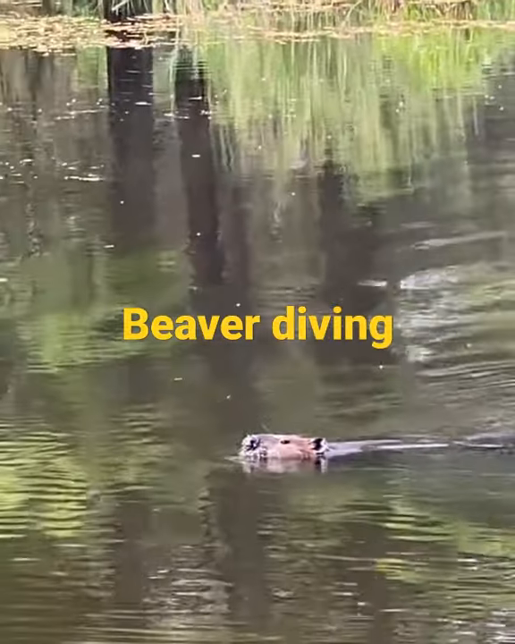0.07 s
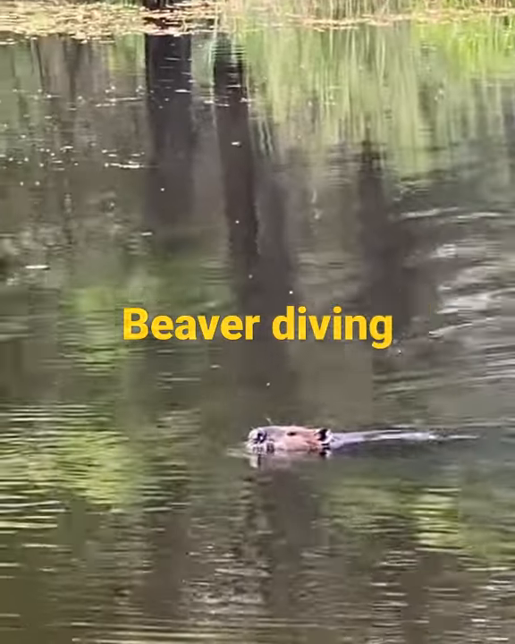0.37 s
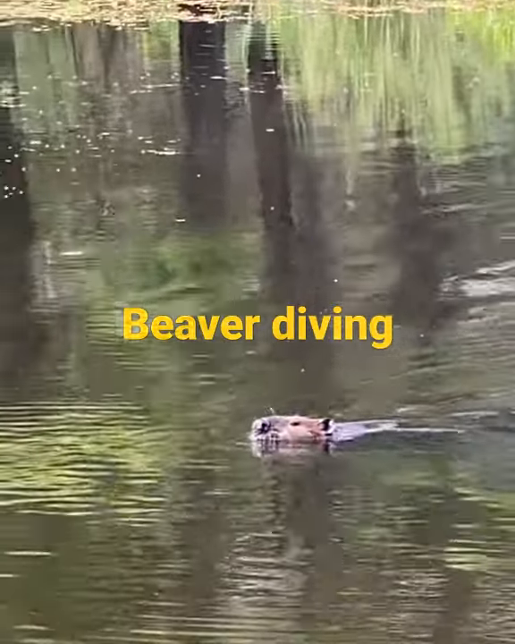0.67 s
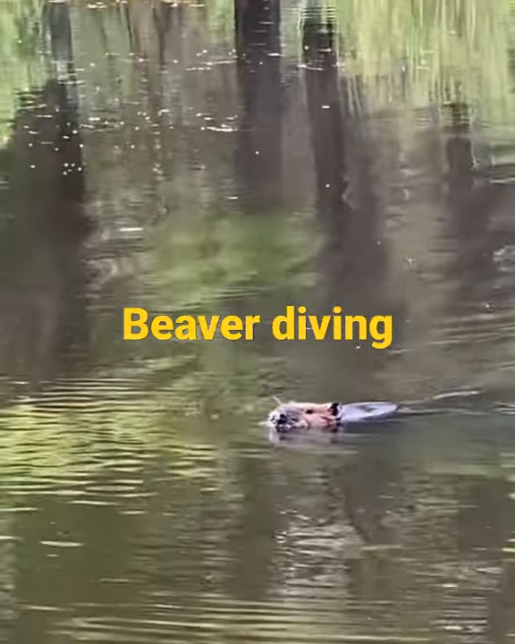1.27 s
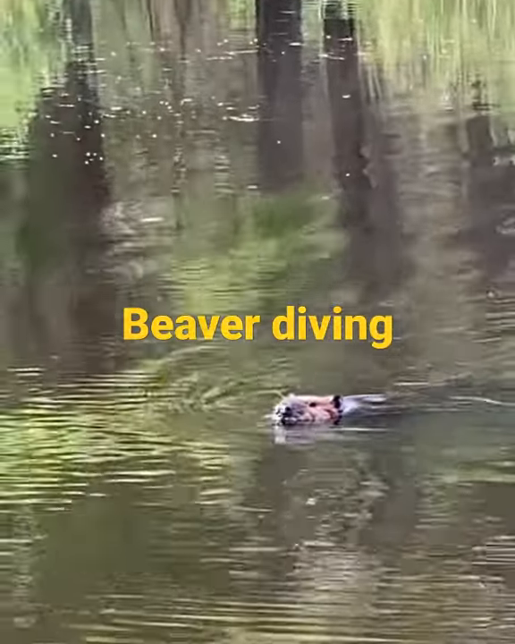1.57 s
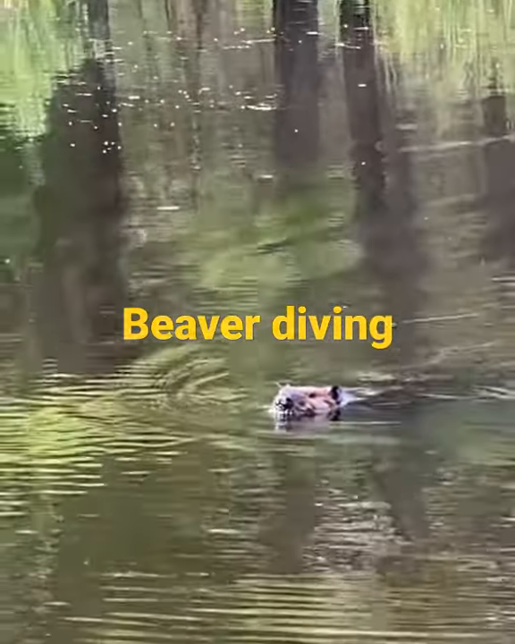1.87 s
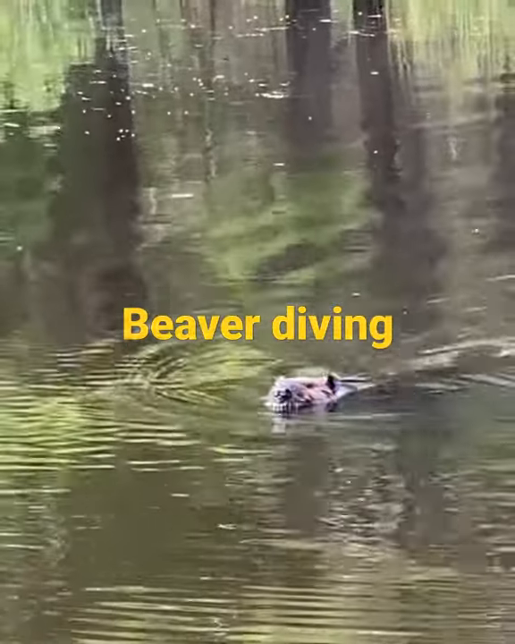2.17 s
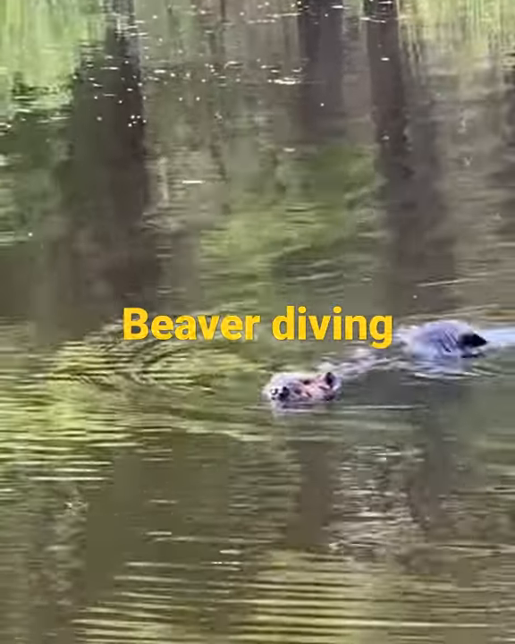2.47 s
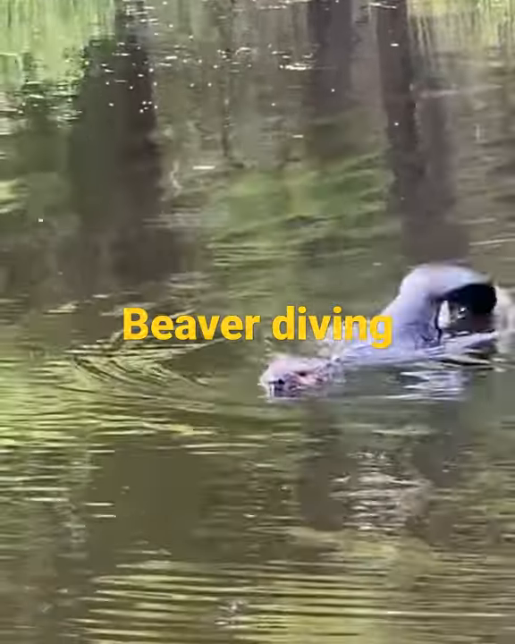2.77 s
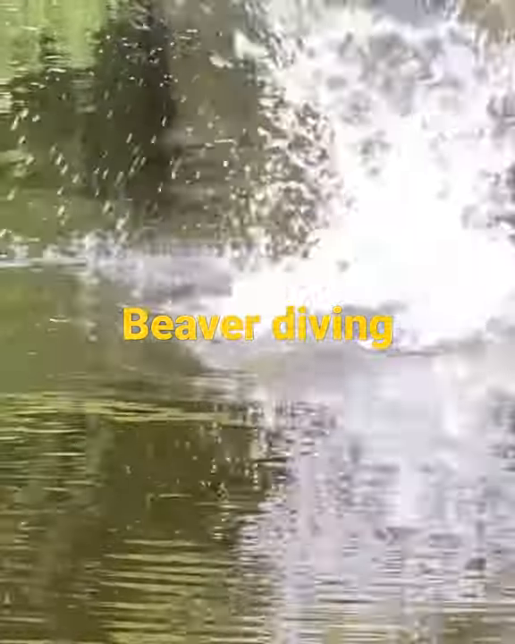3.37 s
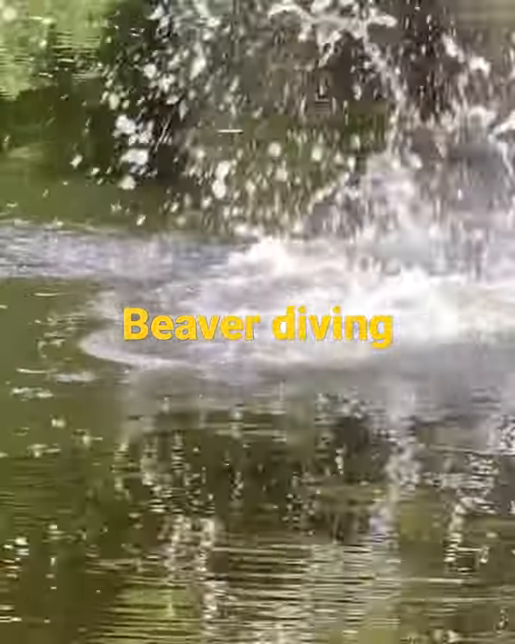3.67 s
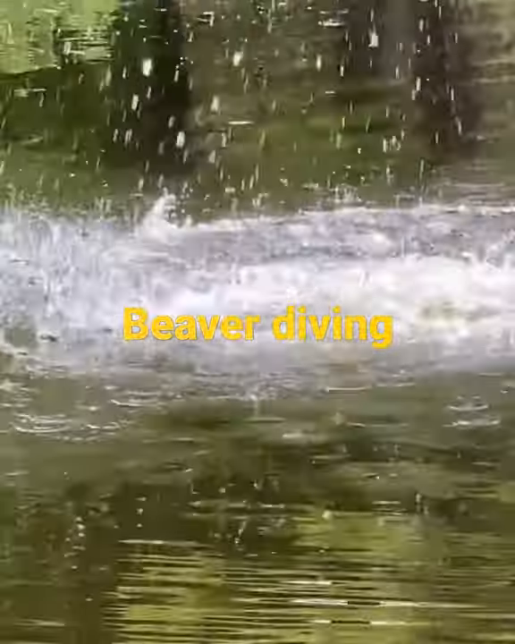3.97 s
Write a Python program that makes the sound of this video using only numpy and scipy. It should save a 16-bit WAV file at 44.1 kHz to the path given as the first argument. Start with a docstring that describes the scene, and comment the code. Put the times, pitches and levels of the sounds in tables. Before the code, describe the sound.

A sharp beaver tail slap on a quiet pond, followed by a booming, splashing dive.

```python
"""Beaver tail slap on a pond

A swimming beaver slaps its tail on the water, kicks and dives. Each impact cracks on the surface and
opens an air cavity whose resonance falls as it grows; the dive's cavity booms, then rises as it closes.
Thrown water rains back as spray, drops and ringing bubbles. The wooded bank reverberates faintly,
over a distant hush and a low rumble."""
import sys
import numpy as np
from scipy import signal
from scipy.fft import rfft, irfft, next_fast_len
from scipy.io import wavfile
from scipy.ndimage import map_coordinates

SR = 44100
rng = np.random.default_rng(int(sys.argv[2]) if len(sys.argv) > 2 else 0)


def transcribe(signal):
    """Save signal, clipped to [-1, 1], as a 16-bit WAV file at the path in sys.argv[1]."""
    frames = np.atleast_2d(signal).T
    limited = np.clip(frames, -1, 1)
    pcm = np.round(limited * 32767).astype(np.int16)
    wavfile.write(sys.argv[1], SR, pcm)


N = 176400
T = np.arange(N) / SR

# envelope of the distant hush (time [s], relative level [dB])
HUSH_LEVEL = [(0, -57), (.25, -59), (.42, -61.5), (.7, -62.5), (.95, -61.5), (1.25, -60), (1.5, -61),
              (1.7, -62), (1.8, -64), (2.35, -64.5), (2.5, -61.5), (2.85, -61.5)]
# spectrum of the hush (frequency [Hz], level [dB])
HUSH_SPECTRUM = [(90, -25), (160, -10), (250, -9.5), (420, -11), (620, -9.5), (960, -7.5), (1300, -11.5),
                 (1760, -20.5), (2500, -30), (4000, -55.5), (7000, -65)]
# stereo width of hush and hiss (frequency [Hz], left-right correlation [-])
HUSH_CORRELATION = [(60, 0.85), (170, 1), (510, 0.43), (1480, 0.69), (4310, 0.79), (12600, -0.79)]
# balance of hush and swells (frequency [Hz], left minus right [dB])
HUSH_BALANCE = [(60, -8), (130, 8.5), (280, -1.5), (590, 9), (1270, 7), (2730, -3.5), (5850, 8), (12600, 3)]
# swells in the hush (peak time [s], half-width [s], centre [Hz], fall [octaves/s], level [dB])
HUSH_SWELLS = [(0.059, 0.065, 1519, 1, -62.5), (.09, 0.096, 1054, 1.5, -57), (.22, 0.067, 721, 3, -57),
               (.87, 0.18, 942, 1.6, -59), (1.221, .25, 480.7, 0.2, -63), (1.61, 0.12, 894, 1, -62)]
# spectrum of the steady hiss (frequency [Hz], level [dB])
HISS_SPECTRUM = [(1500, -8), (3400, 0.5), (4600, -8.5), (6200, -10), (8000, -12.5), (11000, -12),
                 (13000, -27)]
# envelope of the rumble (time [s], relative level [dB])
RUMBLE_LEVEL = [(0.0, -63.5), (0.42, -71), (0.57, -64), (0.76, -63), (0.99, -63.5), (1.62, -60), (1.9, -69),
                (2.13, -66), (2.34, -62), (2.85, -62.5)]
# spectrum of the rumble (frequency [Hz], level [dB])
RUMBLE_SPECTRUM = [(20, -33.5), (40, -4), (62, 0), (90, -3.5), (140, -11.5), (250, -28.5), (600, -64)]
# reverberation time of the bank (frequency [Hz], t60 [s])
BANK_DECAY = [(150, 0.076), (600, 0.86), (2500, 0.5), (10000, 0.73)]

# stereo width of the water noises (frequency [Hz], left-right correlation [-])
WATER_CORRELATION = [(200, 1), (1000, 0.82), (2000, 0.97), (4000, 0.45), (7000, 0.33), (12000, -0.75)]
# balance of the water sounds (frequency [Hz], left minus right [dB])
WATER_BALANCE = [(60, .5), (300, .9), (480, 2), (650, 7), (900, 5.5), (1400, 3), (2200, -.5), (12000, -.3)]
# drips (time [s], pitch [Hz], level [dB], t60 [s], fall [octaves/s], spatter level [dB])
SMALL_DRIPS = [(.268, 3580, -71, 0.064, 5, -73), (0.515, 3900, -77, 0.07, 3, -78),
               (1.615, 3480, -79, .07, 3, -77), (2.536, 3690, -61, 0.07, 14, -86)]
# clumps of water falling back (time [s], splat level [dB], t60 [s], spatter level [dB])
FALLING_CLUMPS = [(3.121, -45.5, 0.17, -56), (3.146, -32, 0.017, -58), (3.161, -42.5, 0.05, -62),
                  (3.281, -61, 0.11, -51), (3.335, -50, 0.016, -56), (3.3575, -36.5, 0.06, -53),
                  (3.408, -42, 0.036, -56), (3.566, -47, 0.044, -44.5), (3.607, -40.5, .05, -47),
                  (3.615, -40, 0.043, -45), (3.677, -44, 0.022, -54), (3.694, -38, .025, -58),
                  (3.711, -39.5, 0.047, -43.5), (3.766, -43, 0.047, -52), (3.811, -43, 0.089, -60),
                  (3.887, -37.5, 0.023, -40), (3.924, -46, 0.022, -46), (3.942, -49, 0.03, -39.5),
                  (3.961, -56, 0.057, -43)]
# spectrum of a clump's splat (frequency [Hz], level [dB])
SPLAT_SPECTRUM = [(300, -8), (900, -4.5), (1500, 4.5), (3000, -6.5), (7000, -20), (13000, -40)]
# spectrum of the bright spatter (frequency [Hz], level [dB])
SPATTER_SPECTRUM = [(1500, -16), (3000, -1.5), (4200, 1), (7000, -3), (9000, -7), (13000, -20)]
# envelopes of the splash (time [s], relative churn level [dB], relative spray level [dB])
SPLASH_LEVELS = [(2.76, -99, -100), (2.83, -92, -73.5), (2.89, -73, -73.5), (2.94, -59, -61.5),
                 (3.005, -58.5, -63.5), (3.05, -57, -63.5), (3.09, -53.5, -60.5), (3.135, -50.5, -56),
                 (3.18, -42.5, -54.5), (3.25, -48.5, -55.5), (3.33, -47.5, -53.5), (3.44, -45.5, -51.5),
                 (3.52, -47.5, -50), (3.59, -50.5, -49.5), (3.65, -51.5, -52), (3.73, -53, -50.5),
                 (3.83, -52, -52), (3.91, -56.5, -52), (3.96, -58, -49), (4.0, -64.5, -53.5)]
# spectrum of the churning water (frequency [Hz], level [dB])
CHURN_SPECTRUM = [(60, 8.5), (150, 7), (330, 0.5), (520, -5.5), (900, 1), (1450, -1.5), (2200, -6.5),
                  (4000, -13), (9000, -55)]
# spectrum of the fine spray (frequency [Hz], level [dB])
SPRAY_SPECTRUM = [(500, -31), (1400, -2), (2200, -5.5), (4000, -5.5), (5000, -6), (7500, -4), (10000, -4.5),
                  (13000, -10.5)]
# single bubbles (time [s], pitch [Hz], level [dB], t60 [s], rise [octaves/s])
RINGING_BUBBLES = [(2.704, 1030, -51, .045, 36), (2.931, 362, -25, 0.032, 0), (2.965, 513, -49, 0.24, -2.5),
                   (3.005, 387, -42.5, 0.18, -3), (3.044, 348, -30.5, 0.072, 7), (3.1, 125, -35, .06, 0),
                   (3.113, 677, -41, 0.037, 7), (3.124, 342, -34, 0.079, 13),
                   (3.1475, 1550, -25, 0.018, 13.5), (3.158, 666, -34.5, 0.041, 4),
                   (3.179, 1490, -35, 0.03, -7), (3.2, 581, -31, .075, 10), (3.22, 232, -37.5, 0.11, 1.5),
                   (3.296, 343, -35.5, 0.067, 6.5), (3.359, 966, -40, 0.13, -5.5),
                   (3.432, 920, -42.5, 0.051, 7), (3.519, 1474, -40.5, 0.096, 3),
                   (3.59, 82.6, -42.5, 0.38, -1), (3.604, 950, -42.5, 0.043, 14),
                   (3.771, 1010, -39.5, 0.043, 7), (3.862, 1026, -41, 0.04, 6)]
# resonance of the dive's cavity (time [s], pitch [Hz], level [dB])
DIVE_CAVITY = [(3.163, 72, -35), (3.1665, 71, -20), (3.18, 66, -17), (3.2, 56.5, -21.5), (3.25, 56.7, -29),
               (3.31, 61.9, -31.5), (3.36, 71.2, -34.5), (3.392, 90.5, -38.5), (3.415, 119.7, -32.5),
               (3.445, 244, -42), (3.49, 356, -49), (3.53, 394, -79)]
# spectrum of the tail's edge cutting the surface (frequency [Hz], level [dB])
SKIM_SPECTRUM = [(300, -0.5), (1500, -10), (4000, -9.5), (7500, -8), (13000, -16)]
# spectrum of the surface crack (frequency [Hz], level [dB])
CRACK_SPECTRUM = [(200, -29), (800, 1), (1600, 3.5), (2800, -6.5), (4000, -14), (5400, -11.5), (8000, -14),
                  (12000, -10.5), (14000, -28)]
# tail slap and kick (time [s], cavity level [dB], first pitch [Hz], open pitch [Hz], opening [s],
# attack [s], hold [s], t60 [s], crack level [dB], crack cutoff [Hz])
IMPACTS = [(2.9193, -11, 1410, 311, 0.00093, 0.00061, 0.0048, 0.0091, -24.5, 18000),
           (3.0689, -26, 1270, 63.4, 0.003, 0.0012, 0.0025, 0.093, -34, 6000)]
# brief metallic ring of the microphone body, set off by each crack (frequency [Hz], relative level [dB])
MIC_RING_PARTIALS = [(985, 2.5), (1430, -1.5), (1700, -14), (2210, -30), (2810, -9), (3360, -15),
                     (3750, -13.5), (5330, -11.5), (7320, -17), (8000, -13)]
# microphone response (frequency [Hz], gain [dB])
MIC_RESPONSE = [(20, -35), (36, -8), (52, 0.5), (420, 1.5), (520, 0.5), (700, 0.5), (980, 2), (1130, -0.5),
                (1400, 0.5), (1750, -0.5), (2200, 1.5), (2550, 0), (2850, 2.5), (3200, 0.5), (4300, 1.5),
                (4880, -3), (5250, 2), (6000, 0.5), (13000, -3)]


def amp(db):
    """Decibels to amplitude ratio."""
    return 10 ** (np.asarray(db) / 20)


def along(points, hz):
    """Interpolation on a logarithmic frequency axis."""
    freqs, values = np.transpose(points)
    return np.interp(np.log(hz + 1), np.log(freqs + 1), values)


def curves(rows):
    """Linear interpolation in time of each column after the first."""
    times, *columns = np.transpose(rows)
    return [np.interp(T, times, column) for column in columns]


def wobble(rate):
    """Smooth random modulation with rate knots a second."""
    return map_coordinates(rng.standard_normal(int(N * rate / SR) + 4), [T * rate])


def filtered(x, response):
    """Linear filtering: the spectrum times a frequency response."""
    size = next_fast_len(N + SR // 4)
    return irfft(rfft(x, size) * response(np.fft.rfftfreq(size, 1 / SR)), size)[..., :N]


def lowpass(x, cut_hz, order):
    """Zero-phase attenuation above cut_hz."""
    return filtered(x, lambda hz: 1 / (1 + (hz / cut_hz) ** order))


def spread(pair, spectrum, correlation):
    """Mid-side mixing turns two independent signals into coloured stereo of rms 1."""
    def response(hz):
        angle = np.arccos(np.clip(along(correlation, hz), -1, 1)) / 2
        return amp(along(spectrum, hz)) * [np.cos(angle), np.sin(angle)]
    mid, side = filtered(pair, response)
    stereo = np.array([mid + side, mid - side])
    return stereo / np.sqrt(np.mean(stereo ** 2) + 1e-20)


def noise(spectrum, correlation=WATER_CORRELATION):
    """Partly correlated stereo noise of rms 1."""
    return spread(rng.standard_normal((2, N)), spectrum, correlation)


def balanced(x, balance):
    """A level difference between the channels that changes with frequency: each band is louder in one channel."""
    def gains(hz):
        pair = amp(along(balance, hz) * np.array([[.5], [-.5]]))
        return pair / pair.mean(axis=0)
    return filtered(x, gains)


def burst(start, attack, t60, hold=0):
    """Envelope of a damped response: attack, hold, then a fall of 60 dB per t60 seconds."""
    age = np.maximum(T - start, 0)
    return (1 - np.exp(-age / attack)) * amp(-60 * np.maximum(age - hold, 0) / t60)


def tone_from(start, hz):
    """A sine whose phase is the integral of frequency from start."""
    return np.sin(2 * np.pi * np.cumsum(hz * (T >= start)) / SR)


def sliding_band(hz, width_hz):
    """Random quadrature modulation makes a band of noise around a moving pitch."""
    phase = 2 * np.pi * np.cumsum(hz) / SR
    return wobble(width_hz) * np.cos(phase) + wobble(width_hz) * np.sin(phase)


def swells():
    """Far whooshes: noise bands glide down under Gaussian envelopes."""
    out = 0
    for peak, width, hz, fall, db in HUSH_SWELLS:
        centre = hz * 2 ** (-fall * np.clip(T - peak, -2 * width, 2 * width))
        out += amp(db) * np.exp(-((T - peak) / width) ** 2) * sliding_band(centre, width_hz=560)
    return out


def ambience():
    """Superposition of a distant hush, a steady hiss, an unsteady rumble and one soft, damped bump."""
    hush = amp(curves(HUSH_LEVEL)[0] + 2.5 + .3 * wobble(13)) * noise(HUSH_SPECTRUM, HUSH_CORRELATION)
    hiss = amp(-83.5) * noise(HISS_SPECTRUM, HUSH_CORRELATION)
    rumble = amp(curves(RUMBLE_LEVEL)[0] + 6 + wobble(16)) * noise(RUMBLE_SPECTRUM, [(60, 0.99)])
    bump_s, bump_hz = 1.207, 119.6 * (1 + 0.2 * wobble(120))
    bump = amp(-37) * burst(bump_s, attack=0.00052, t60=0.13) * tone_from(bump_s, bump_hz)
    return balanced(hush + swells(), HUSH_BALANCE) + hiss + rumble + bump


def bank(x):
    """Reverberation: trees on the bank scatter sound into a tail, each band decaying at its own rate."""
    hz, t, bands = signal.stft(rng.standard_normal((2, SR)), SR, nperseg=256)
    decay = amp(-60 * t / along(BANK_DECAY, hz)[:, None])
    tail = signal.istft(bands * decay, SR, nperseg=256)[1]
    return signal.fftconvolve(x, tail / np.linalg.norm(tail[0]), axes=1)[:, :N]


def drips():
    """Small impacts give fuzzy plips: damped noise bands that sink in pitch, with a trace of spatter."""
    spatter = noise(SPATTER_SPECTRUM)
    out = 0
    for start, hz, db, t60, fall, spatter_db in SMALL_DRIPS:
        plip = sliding_band(hz * 2 ** (-fall * np.clip(T - start, 0, t60 / 2)), width_hz=930)
        out += burst(start, 0.0036, t60) * (amp(db) * plip + amp(spatter_db) * spatter)
    return out


def clumps():
    """Impact noise: each heavier clump of water lands with a splat and throws a bright spatter."""
    splat, spatter = noise(SPLAT_SPECTRUM), noise(SPATTER_SPECTRUM)
    return sum(burst(start, 0.0013, t60) * (amp(db) * splat + amp(spatter_db) * spatter)
               for start, db, t60, spatter_db in FALLING_CLUMPS)


def grains(centre_hz, octaves, cycles, rise, scatter_db, count, samples):
    """Two streams of small bubbles: damped oscillators that rise in pitch and lose 60 dB over cycles."""
    start = SPLASH_LEVELS[0][0]
    when, side = rng.random((count, 2)).T
    hz = np.clip(centre_hz * 2 ** (octaves * rng.standard_normal((count, 1))), 150, 12000)
    gain = amp(scatter_db * np.minimum(rng.exponential(size=(count, 1)), 3))
    t = np.arange(samples) / SR
    age = np.minimum(t * hz / cycles, 2)  # in units of t60
    envelope = gain * amp(-60 * age) * (1 - t / t[-1])
    rings = envelope * np.sin(2 * np.pi * hz * t * (1 + rise * age / 2))
    index = ((start + when * (N / SR - start)) * SR).astype(int)[:, None] + np.arange(samples)
    out = np.array([np.bincount(index[stream].ravel(), rings[stream].ravel(), N + samples)[:N]
                    for stream in (side < .5, side >= .5)])
    return out / out[:, T > start].std()


def with_noise(x, share):
    """Incoherent signals add in power: x supplies the given share, white noise the rest."""
    return np.sqrt(share) * x + np.sqrt(1 - share) * rng.standard_normal((2, N))


def splash():
    """Many small resonances merge: churning froth, and a spray of fine drops, hard drops and tinkle."""
    froth = grains(1230, octaves=0.853, cycles=30, rise=0.2, scatter_db=1.5, count=2600, samples=1300)
    drops = grains(4100, octaves=0.98, cycles=11, rise=0.11, scatter_db=2, count=6000, samples=300)
    patter = grains(3460, octaves=0.63, cycles=5.8, rise=0.1, scatter_db=0, count=260, samples=200)
    tinkle = grains(4490, octaves=0.7, cycles=300, rise=0.011, scatter_db=1, count=500, samples=3000)
    churn_db, spray_db = curves(SPLASH_LEVELS)
    churn = amp(churn_db) * spread(with_noise(froth, share=0.46), CHURN_SPECTRUM, WATER_CORRELATION)
    spray_gain = amp(spray_db + 0.35 * wobble(60))
    droplets = with_noise(drops, share=0.39) + amp(-9.5) * patter + amp(-7) * tinkle
    spray = spray_gain * spread(droplets, SPRAY_SPECTRUM, WATER_CORRELATION)
    return amp(-2) * (churn + spray)


def bubbles():
    """Bubble resonance: larger air pockets ring one by one, their pitch shaken by the churning water."""
    shake = 1 + 0.07 * wobble(280)
    attack_cycles = 1.16
    out = 0
    for start, hz, db, t60, rise in RINGING_BUBBLES:
        pitch = hz * shake * 2 ** (rise * np.clip(T - start, 0, t60 / 2))
        out += amp(db) * burst(start, attack_cycles / hz, t60) * tone_from(start, pitch)
    return out


def dive():
    """Cavity resonance: air dragged down by the body booms, then rises and flutters as it pinches shut."""
    start, opening_s, flutter_from_s = 3.163, 0.00309, 3.4
    hz, db = curves(DIVE_CAVITY)
    flutter = 0.16 * np.clip((T - flutter_from_s) / 0.034, 0, 1)
    opening_hz = 537 * np.exp(-np.maximum(T - start, 0) / opening_s)
    pitch = hz * (1 + flutter * wobble(160)) + opening_hz
    envelope = amp(db) * (1 + 2 * flutter * wobble(200)) * (T < DIVE_CAVITY[-1][0])
    return envelope * tone_from(start, pitch)


def skim():
    """A broadband transient: the tail's edge cuts the surface just before the slap."""
    return amp(-40.5) * burst(2.9055, attack=0.00092, t60=0.19) * noise(SKIM_SPECTRUM)


def mic_ring(start):
    """Modal resonance: a crack sets the microphone body ringing briefly."""
    partials = sum((-1) ** k * amp(db) * np.sin(2 * np.pi * hz * (T - start))
                   for k, (hz, db) in enumerate(MIC_RING_PARTIALS))
    return amp(-3.5) * burst(start, attack=0.00058, t60=0.037) * partials


def slap_and_kick():
    """Each impact cracks on the surface, then opens a cavity whose resonance falls as its volume grows."""
    lead_s, rise_s, crack_t60 = 0.001793, 0.0013, 0.023
    crack_noise = noise(CRACK_SPECTRUM)
    out = 0
    for start, db, first_hz, open_hz, opening, attack, hold, t60, crack_db, cut_hz in IMPACTS:
        t = T - start + lead_s  # the crack peaks just before the cavity opens
        crack = np.exp(np.minimum(t / rise_s, -np.log(1000) * t / crack_t60)) * crack_noise
        out += amp(crack_db) * lowpass(crack + mic_ring(start - lead_s), cut_hz, order=2)
        pitch = open_hz + (first_hz - open_hz) * np.exp(-np.maximum(T - start, 0) / opening)
        cavity = amp(db) * burst(start, attack, t60, hold) * tone_from(start, pitch)
        out += cavity - lowpass(cavity, 0.36 * open_hz, order=4)  # little radiates far below resonance
    return out


def scene():
    """Superposition of the direct water sounds, their reverberation and the background."""
    water = skim() + slap_and_kick() + dive() + bubbles() + splash() + clumps() + drips()
    return balanced(water + amp(-22.5) * bank(water), WATER_BALANCE) + ambience()


def record(dry):
    """The microphone's frequency response colours the sound; a steep low-pass limits the band."""
    coloured = filtered(dry, lambda hz: amp(along(MIC_RESPONSE, hz)))
    return lowpass(coloured, cut_hz=13150, order=120)


dry = scene()
out = record(dry)
transcribe(out)
```